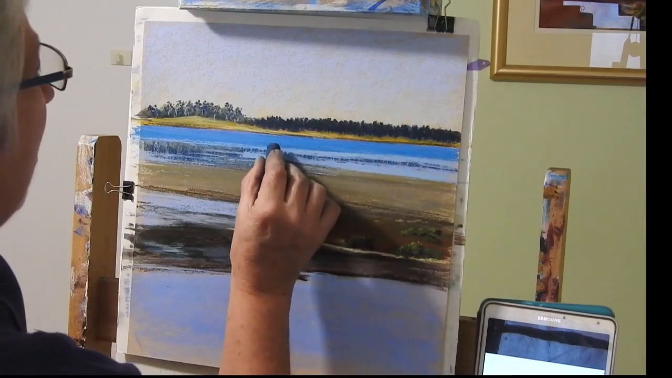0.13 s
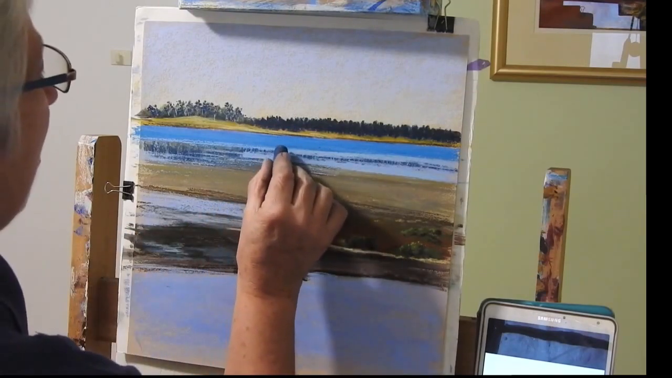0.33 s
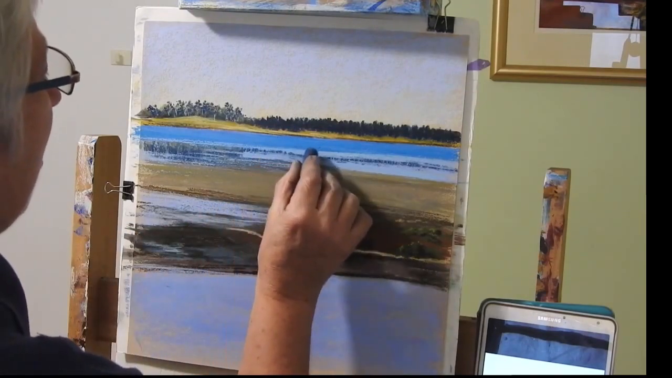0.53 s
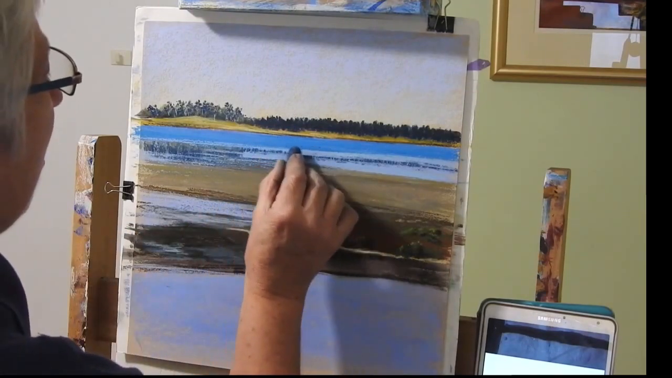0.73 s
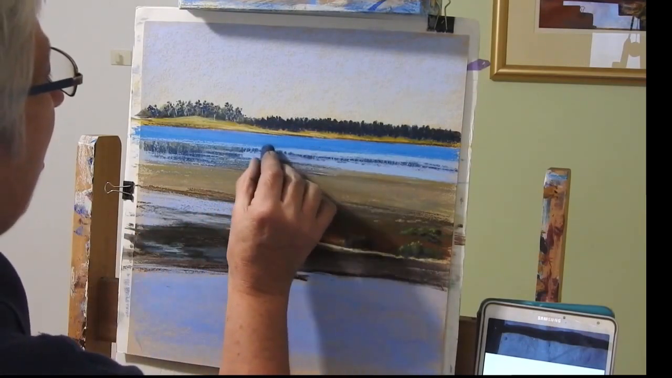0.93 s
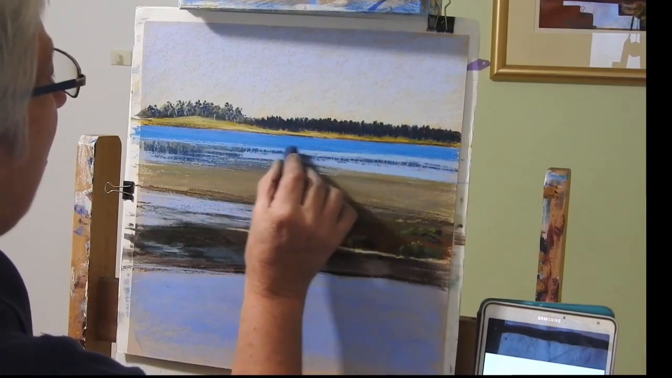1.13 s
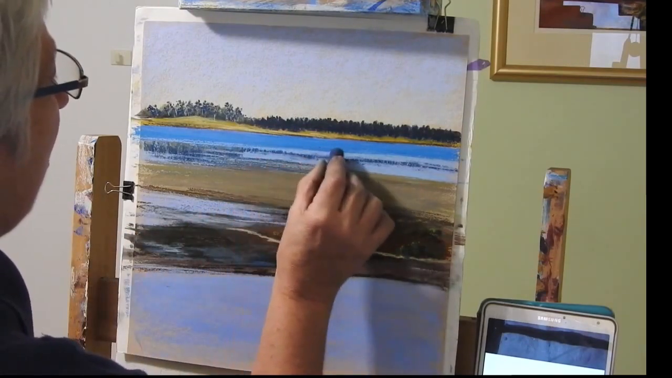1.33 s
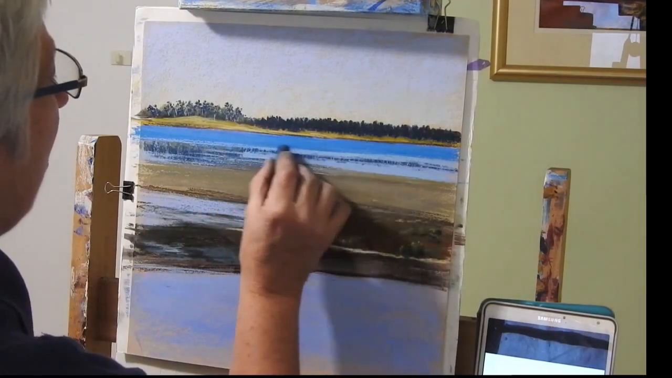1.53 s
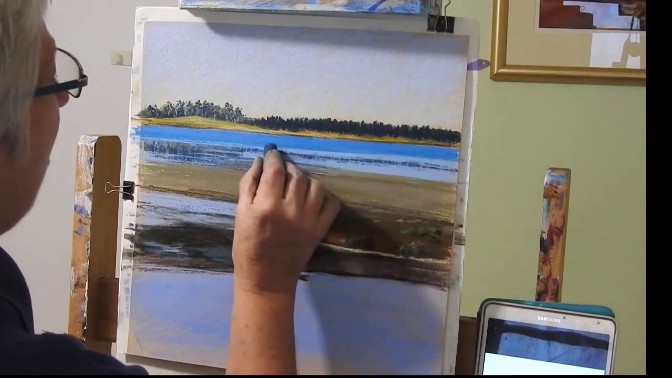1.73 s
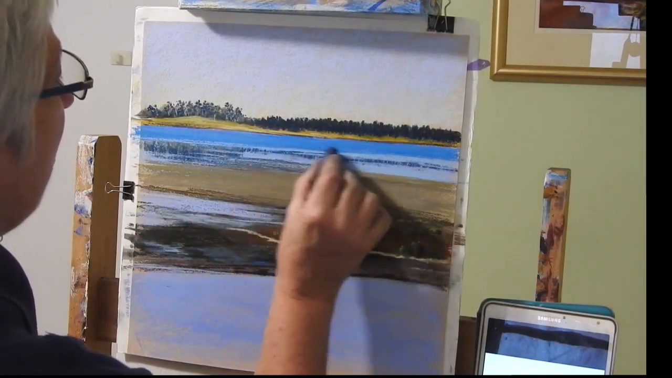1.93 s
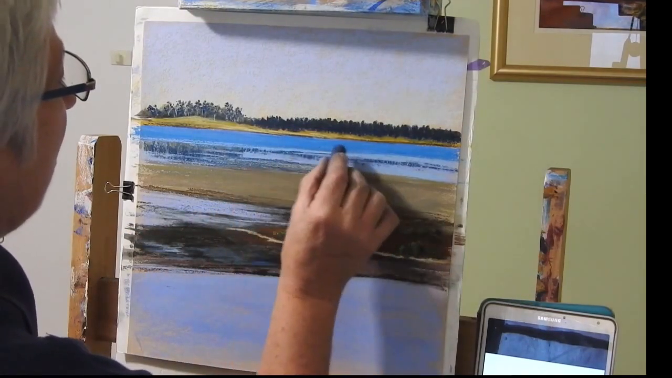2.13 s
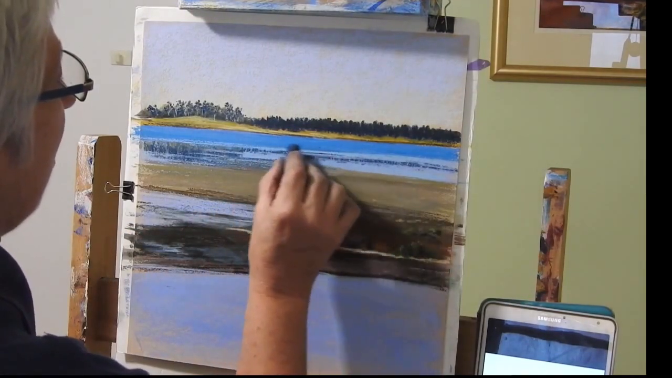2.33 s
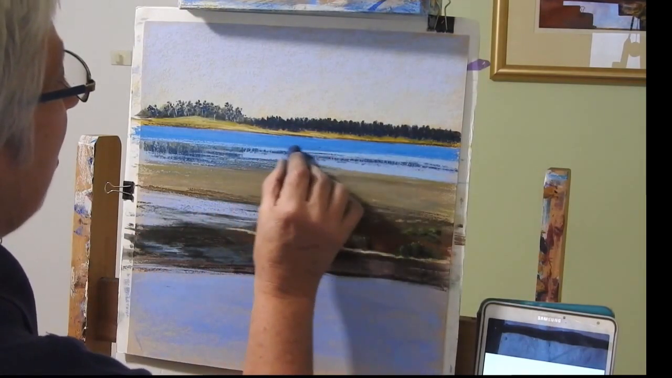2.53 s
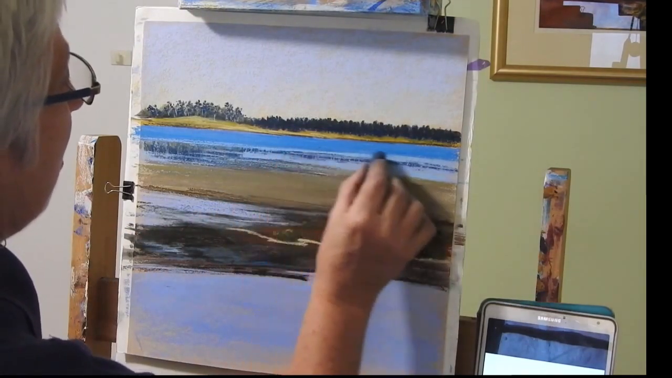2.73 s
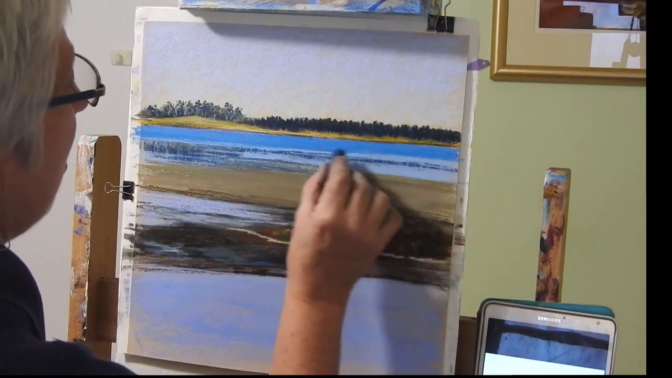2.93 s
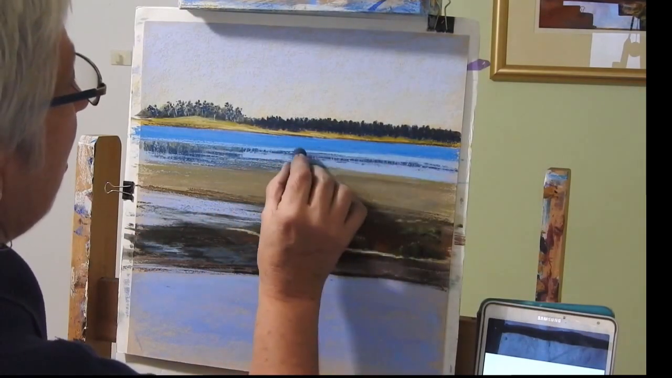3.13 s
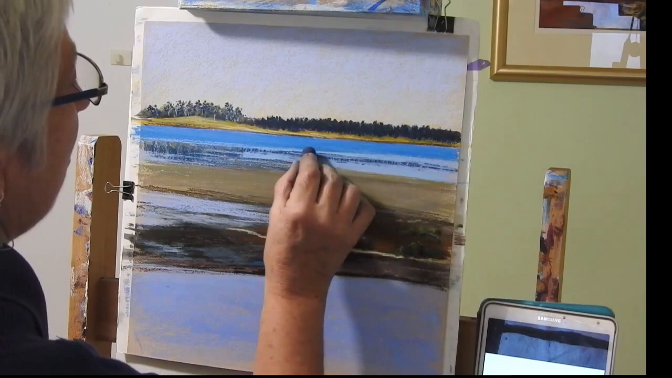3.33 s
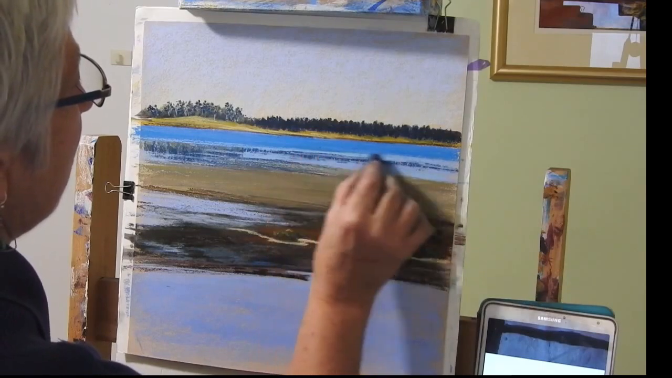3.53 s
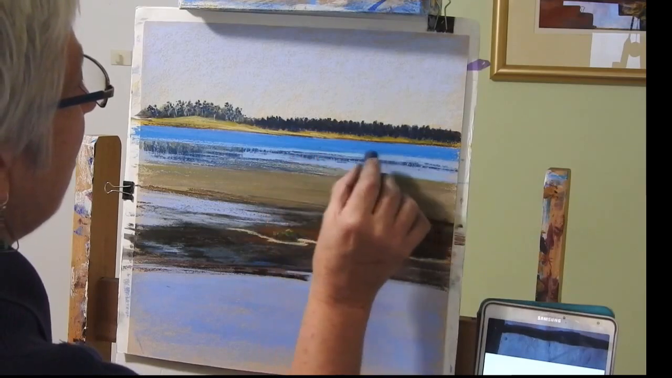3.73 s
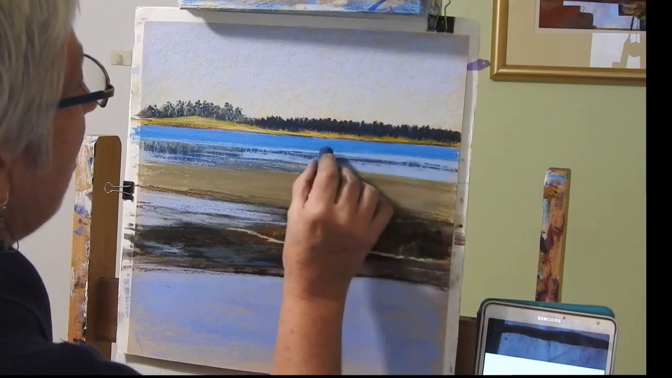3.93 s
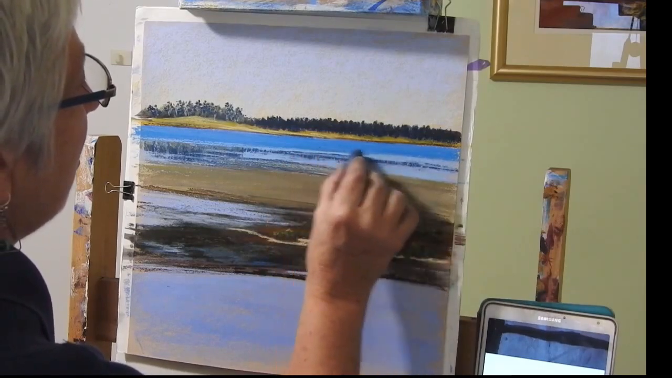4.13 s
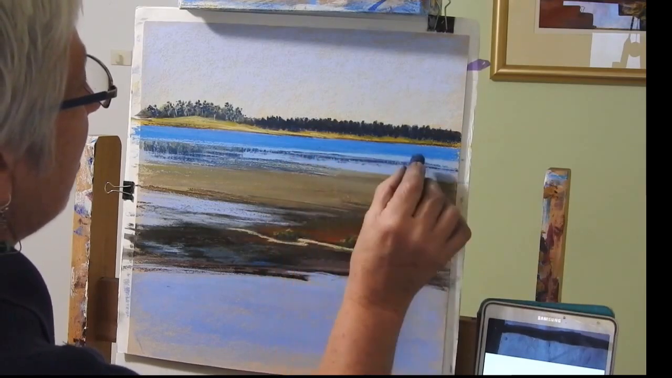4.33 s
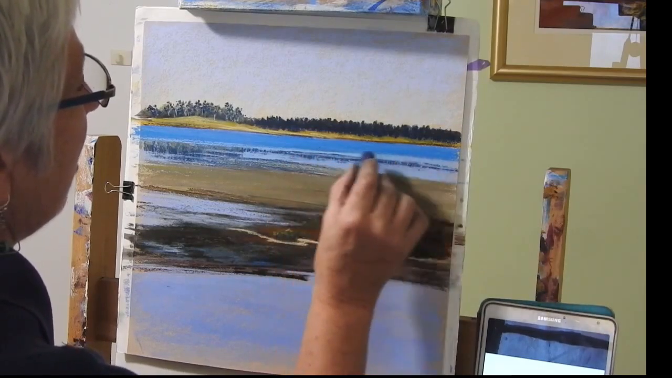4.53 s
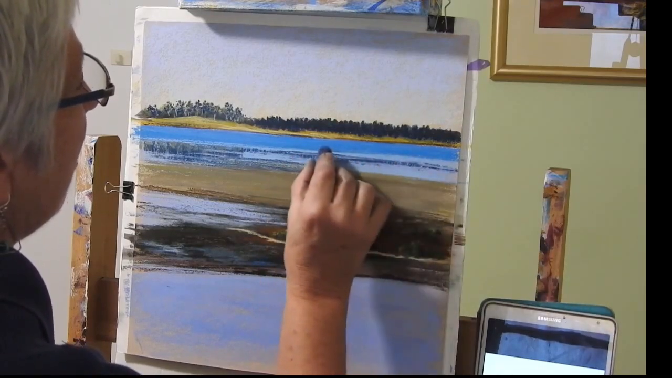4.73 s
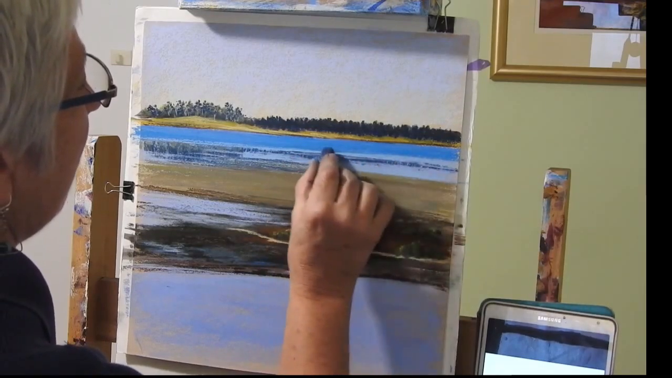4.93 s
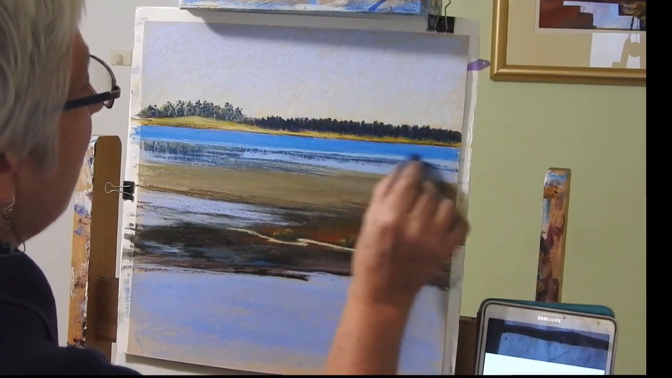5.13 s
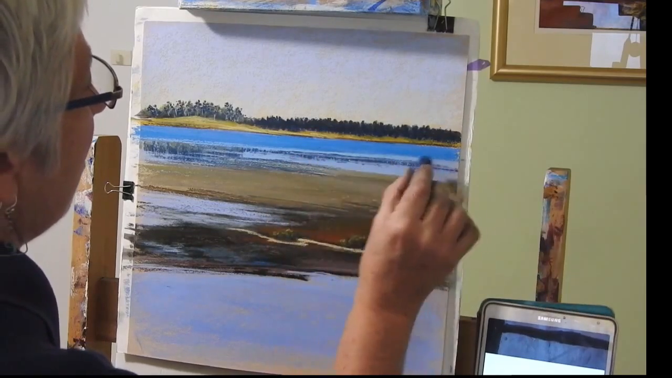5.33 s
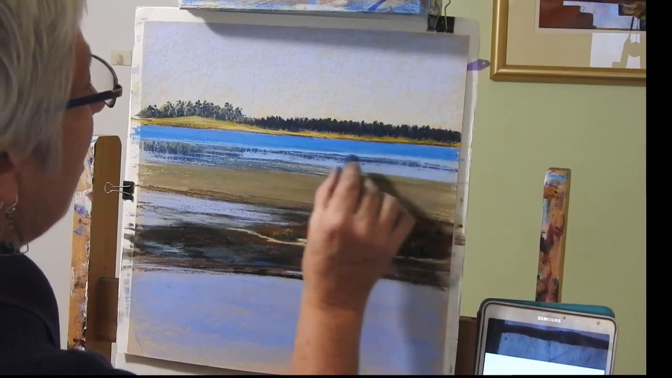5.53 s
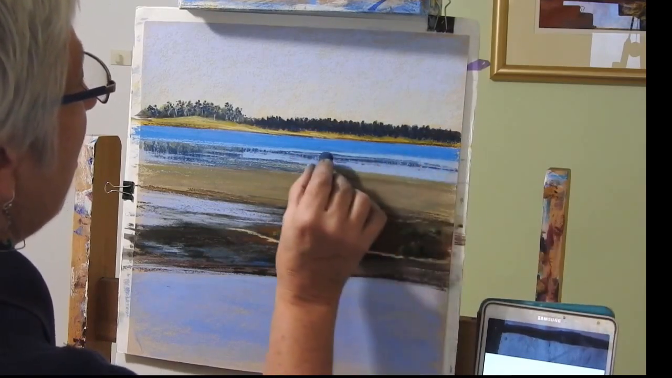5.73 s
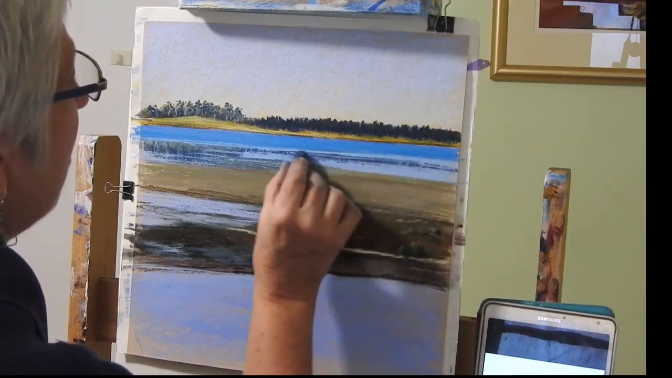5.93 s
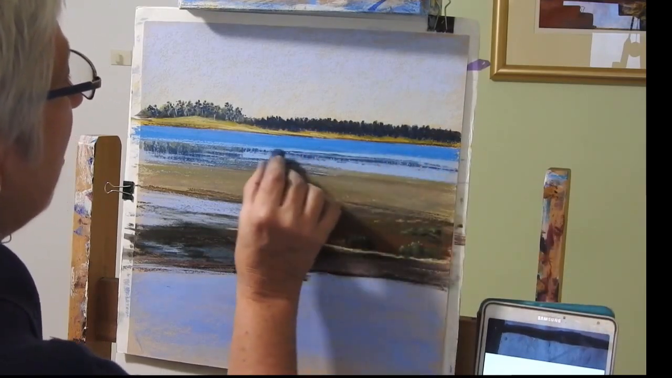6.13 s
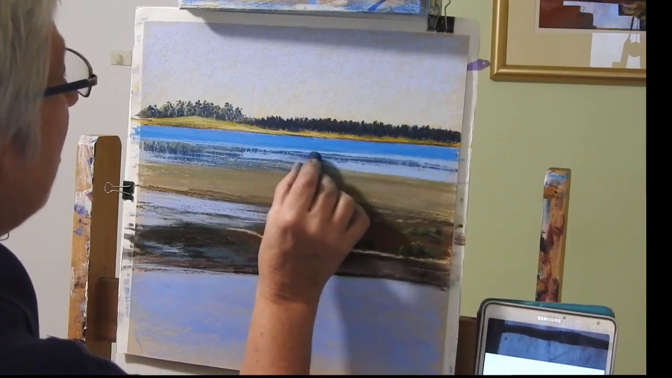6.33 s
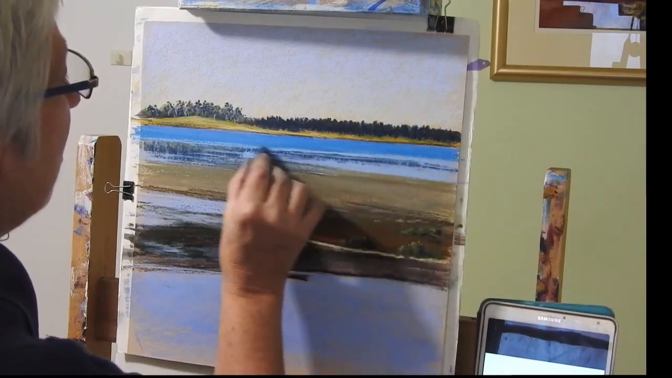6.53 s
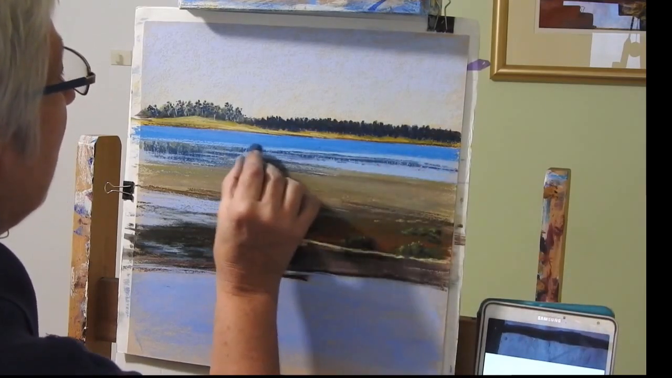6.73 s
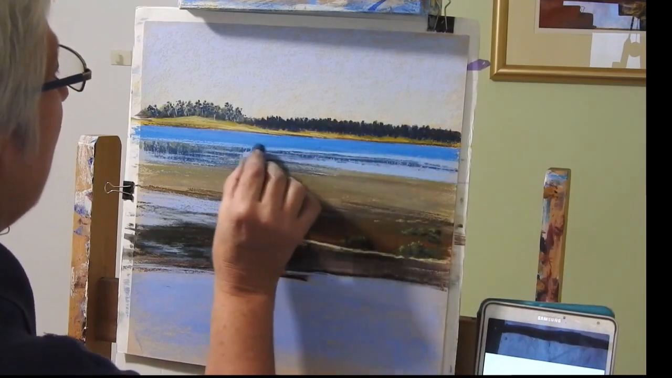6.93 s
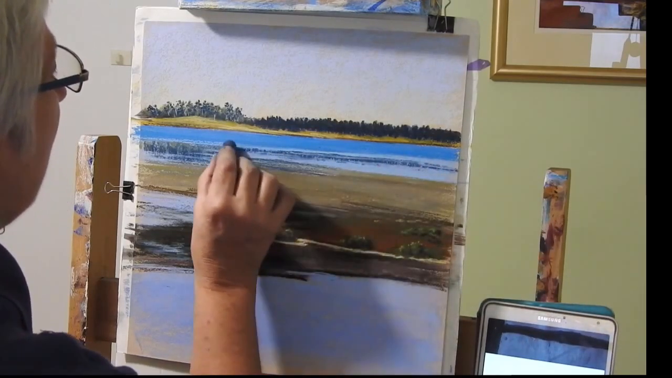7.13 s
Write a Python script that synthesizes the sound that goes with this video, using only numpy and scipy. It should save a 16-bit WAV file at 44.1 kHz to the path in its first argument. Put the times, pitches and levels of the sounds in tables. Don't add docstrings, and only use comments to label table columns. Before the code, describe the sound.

In a quiet indoor room, low engine drone surges through the walls at first, then settles into soft rumble. A pastel stick makes short, dry, gritty scrapes on textured paper, each about a fifth of a second, with hollow woody board ring, small thumps and fizzy flicks at the ends. Strokes come irregularly, with pauses. Close stereo microphone, short room reflection, light hiss.

```python
import sys
import numpy as np
from scipy import signal
from scipy.fft import rfft, irfft
from scipy.io import wavfile

SR = 44100
rng = np.random.default_rng(int(sys.argv[2]) if len(sys.argv) > 2 else 0)


def log_audio(samples):
    frames = np.atleast_2d(samples).T
    limited = np.clip(frames, -1, 1)
    pcm = np.round(limited * 32767).astype(np.int16)
    wavfile.write(sys.argv[1], SR, pcm)


def invert_db(level):
    return 10 ** (np.asarray(level, dtype=float) / 20)


N = 316197


def evened(x):
    return x / np.sqrt(np.mean(x ** 2) + 1e-20)


def read(points, hz):
    f, value = np.transpose(points)
    return np.interp(np.log(hz + 1), np.log(f + 1), value)


def colour(x, points):
    response = invert_db(read(points, np.fft.rfftfreq(N, 1 / SR)))
    return irfft(rfft(x) * response, N)


def slow(top_hz):
    hz = np.fft.rfftfreq(N, 1 / SR)
    noise = rfft(rng.standard_normal(N))
    return evened(irfft(noise / (1 + (hz / top_hz) ** 4), N))


def resonate(x, hz, width):
    r = np.exp(-np.pi * width / SR)
    pole = r * np.exp(2j * np.pi * hz / SR)
    return 2 * signal.lfilter([1 - r], [1, -pole], x).real


def ports(a, b, same, pan):
    hz = np.fft.rfftfreq(N, 1 / SR)
    angle = np.arccos(np.clip(read(same, hz), 0, 1)) / 2
    mid = rfft(a) * np.cos(angle)
    side = rfft(b) * np.sin(angle)
    tilt = invert_db(read(pan, hz) / 2)
    return irfft(np.array([(mid + side) * tilt, (mid - side) / tilt]), N)


# f/Hz, likeness (0 to 1)
RUB_LIKENESS = [(60, .99), (400, .985), (800, .95), (1500, .93), (3100, .7), (6800, .46), (15000, .38)]
# f/Hz, left minus right/dB
RUB_BALANCE = [(60, 2.5), (180, 0), (550, 4), (1650, 0.5), (4970, 0.5), (15000, -1)]


def pastel():
    hand = pressure()
    views = (rub(*hand) for _ in "ab")
    heard = (view + invert_db(-10.5) * room(view) for view in views)
    return ports(*heard, RUB_LIKENESS, RUB_BALANCE)


# touch t/s, full pressure t/s, lift t/s, board ring level/dB, paper rasp level/dB
STROKES = [(0.837, 0.846, 0.88, -50.5, -59.5), (1.04, 1.127, 1.305, -46, -50.5),
           (1.781, 1.858, 2.018, -43, -48.5), (2.544, 2.592, 2.761, -49, -47),
           (3.378, 3.472, 3.62, -46, -48), (4.03, 4.038, 3.987, -49, -74),
           (4.079, 4.107, 4.264, -47.5, -48.5), (4.36, 4.37, 4.39, -73, -68),
           (4.961, 5.059, 5.166, -42.5, -48), (5.942, 5.944, 6.045, -48, -49),
           (6.396, 6.47, 6.59, -46.5, -48.5)]
# ring f/Hz at touch, flex f/Hz, flex re ring level/dB,
# fizz re rasp level/dB, lag to full speed t/s
CONTACT = [(1120, 430, -2, -1, .001), (1200, 430, -3, 0.5, 0.033), (1150, 430, 1, -0.5, 0.0077),
           (1200, 420, -6, 2, 0.071), (940, 425, -1, 0.5, 0.035), (930, 350, 15, -7, .001),
           (1430, 360, -1.5, 3, 0.059), (950, 330, 8, 3, .001), (1430, 352, -0.5, 3, 0.078),
           (1420, 670, -5, -0.5, 0.016), (1130, 580, -2, 0.5, 0.046)]
# t/s, extra ring level/dB, extra flex level/dB,
# ring f/Hz it has slid to
DIGS = [(1.16, 2, 1, 1130), (1.285, -3.5, 3.5, 1400), (1.872, 4, 9, 1128), (1.97, 6.5, -1, 1250),
        (2.01, 0, -0.5, 1420), (2.545, 7, 16.5, 1420), (2.6, 3, 2, 1420), (2.64, 2, 9.5, 1200),
        (2.685, 10, 3, 890), (2.72, 2, -2, 1420), (3.465, 6, -1, 880), (3.51, 3.5, 1.5, 1400),
        (3.551, 2.5, 9.5, 900), (4.13, 1.5, -1.5, 900), (4.205, 7, 3, 830), (4.222, -6, 10.5, 1010),
        (4.975, 4, 4.5, 1430), (5.03, 1, 1.5, 1430), (5.085, 1.5, 5.5, 955), (5.112, 2, 8, 1015),
        (5.155, -2.5, 7, 900), (5.95, 1.5, -4, 1420), (6.02, 4, 0, 1400), (6.035, 3.5, 5.5, 1190),
        (6.465, 7.5, -2.5, 914), (6.477, 0, 9, 1015), (6.52, -1, -1, 1200), (6.575, 5.5, 4.5, 1150)]
# t/s, extra fizz level/dB
FLICKS = [
    (2.02, 5.5),
    (2.71, 7.5),
    (2.77, 3),
    (3.6, 5),
    (4.26, 1.5),
    (5.16, -1),
    (5.187, 10),
    (5.235, 6),
    (6.035, 5.5),
]


def pressure():
    t = np.arange(N) / SR
    gains, flex_favoured = np.zeros((4, N)), np.ones(N)
    for stroke, contact in zip(STROKES, CONTACT):
        touch, full, lift, ring_db, rasp_db = stroke
        _, flex_hz, flex_db, fizz_db, lag = contact
        board = invert_db(ring_db) * drag(t, touch, full, lift, touch_db=-13, db_per_s=301)
        paper = invert_db(rasp_db) * drag(t, touch, full + lag, lift, touch_db=-14, db_per_s=314)
        gains += [board, board * invert_db(flex_db), paper, paper * invert_db(fizz_db)]
        flex_favoured[t > touch - LAND_S] = flex_hz
    dig_s, ring_db, flex_db, ring_hz = np.transpose(DIGS)
    ring_thumps = bumps(t, dig_s, ring_db, width_s=0.018)
    flex_thumps = bumps(t, dig_s, flex_db, width_s=0.018)
    puffs = bumps(t, *np.transpose(FLICKS), width_s=0.014)
    gains *= invert_db(np.array([ring_thumps, flex_thumps, 0.25 * puffs, puffs]))
    touches = [(stroke[0], contact[0]) for stroke, contact in zip(STROKES, CONTACT)]
    path = sorted(touches + list(zip(dig_s, ring_hz)))
    return gains, np.interp(t, *np.transpose(path)), flex_favoured


LAND_S = 0.0073


def drag(t, touch, full, lift, touch_db, db_per_s):
    lean = np.clip((t - touch) / (full - touch), 0, 1)
    land = np.clip((t - touch) / LAND_S + 1, 0, 1)
    return land * invert_db(touch_db * (1 - lean) - db_per_s * np.maximum(t - lift, 0))


def bumps(t, times, db, width_s):
    return sum(d * np.exp(-((t - s) / width_s) ** 2) for s, d in zip(times, db))


# f/Hz, width/Hz, level/dB
FLEX = [(203, 30, -1), (285, 35, -8), (352, 22, 1), (400, 30, -3), (507, 22, -3), (590, 28, -2.5),
        (680, 35, -3)]
# f/Hz, width/Hz, level/dB
RING = [(775, 30, -5), (830, 24, -4), (876, 24, -5), (914, 26, -1), (1015, 22, 1), (1128, 28, -1),
        (1220, 40, -5), (1397, 24, -3), (1432, 30, 0), (1540, 50, -5), (1700, 70, -6), (1860, 70, -9)]
# f/Hz, width/Hz, level/dB
RASP = [(2200, 36, -12), (2690, 180, 31), (2800, 23, 10), (3190, 380, -4), (3120, 51, 46), (4860, 350, 38),
        (5060, 200, 14)]
# f/Hz, width/Hz, level/dB
SHEEN = [(5670, 560, 18), (6900, 81, -22), (8650, 160, 6), (8900, 200, -17), (9030, 110, 20),
         (9850, 180, -5), (10600, 230, -8)]
# f/Hz, density level/dB per Hz
FIZZ = [(1500, -25), (2100, -6), (2900, -4.5), (3700, -7.5), (4700, -4.5), (5500, -1.5), (7500, -4),
        (10300, -1), (11300, -5), (12300, -14), (14000, -22), (15700, -30)]
# f/Hz, level/dB
REACH = [(150, -5), (260, -0.5), (11000, -1), (13000, -5.5), (16000, -9.5)]


def rub(gains, ring_hz, flex_hz):
    coarse, fine = grit(3000, 1.94), grit(14000, 5.2)
    ring = modes(coarse, RING, 2.5, 0.28, ring_hz) * invert_db(1.5 * slow(45))
    flex = modes(coarse, FLEX, 2, 0.32, flex_hz) * invert_db(1.5 * slow(40))
    dust = colour(sheet(fine), FIZZ)
    low = signal.sosfilt(signal.butter(3, 6000, "low", fs=SR, output="sos"), dust)
    high = signal.sosfilt(signal.butter(3, 6000, "high", fs=SR, output="sos"), dust)
    rasp = evened(evened(low) + 0.32 * modes(fine, RASP, 5.1, loose=0.14))
    fizz = evened(evened(high) + 0.2 * modes(fine, SHEEN, 3, loose=0.11))
    stutter = invert_db(1.36 * slow(38))
    layers = [ring, flex, rasp * stutter, fizz * stutter]
    return colour(np.sum(gains * layers, axis=0), REACH)


def grit(per_s, spread_db):
    size = invert_db(spread_db * np.minimum(rng.exponential(1, N), 4))
    size = size * rng.choice([-1, 1], N)
    return evened(size * (rng.random(N) < per_s / SR))


def modes(x, table, shift_db, loose, favour_hz=None, favour_db=8, octaves=0.17):
    peaks, energy = np.zeros(N), np.zeros(N)
    for hz, width, db in table:
        near = 0 if favour_hz is None else np.exp(-(np.log2(hz / favour_hz) / octaves) ** 2)
        gain = invert_db(db + favour_db * near + shift_db * slow(12.5))
        peaks += gain * evened(resonate(x, hz, width))
        energy += gain ** 2
    band = [0.66 * table[0][0], 0.8 * table[-1][0]]
    fill = signal.sosfilt(signal.butter(2, band, "band", fs=SR, output="sos"), x)
    return evened(peaks / np.sqrt(energy) + loose * evened(fill))


def sheet(x, t60=0.053, turns_per_s=2.6, count=7):
    t, ring_t = np.arange(N) / SR, np.arange(4096) / SR
    out = np.zeros(N)
    for k in range(count):
        share = np.cos(np.pi * (turns_per_s * t + k / count)) ** 4
        response = rng.standard_normal(len(ring_t)) * invert_db(-60 * ring_t / t60)
        out += signal.oaconvolve(share * x, response)[:N]
    return evened(out)


def room(x, t60=0.15):
    t = np.arange(SR // 2) / SR
    taps = rng.standard_normal(len(t)) * (t > 0.006)
    dull = signal.lfilter([0.25], [1, -0.75], taps)
    tail = dull * invert_db(-60 * t / t60) + 2 * taps * invert_db(-60 * t / (0.68 * t60))
    return signal.fftconvolve(x, tail / np.linalg.norm(tail))[:N]


# centre t/s, length t/s, f/Hz, level/dB
SURGES = [(.04, .24, 74, -35), (.3, .3, 71.5, -35), (.68, .55, 74, -33), (0, .2, 146, -36),
          (.65, .42, 143.6, -36), (.92, .24, 145, -42), (0, .3, 96, -39), (.32, .25, 97.6, -41),
          (2.55, .3, 96.5, -44), (1.06, .4, 83.5, -40), (1.68, .5, 82, -41), (1.3, .35, 164, -45),
          (1.6, .4, 165.5, -39), (1.88, .35, 165, -46), (1.72, .4, 248, -53), (2.9, .15, 111.8, -46),
          (4.15, .3, 109.5, -47), (6.08, .3, 91.2, -46), (6.95, .4, 89.4, -44), (6.5, .35, 67, -45)]
# start t/s, end t/s, first f/Hz, last f/Hz, level/dB
HUMS = [(1.25, 2.2, 70, 73, -48), (1.05, 3.9, 144.5, 142.5, -51), (4.3, 5.3, 143, 143, -54),
        (.55, 2.4, 98.6, 99.7, -52), (3, 4.6, 110, 109.3, -49), (4.62, 5.92, 92.3, 91.2, -43.5),
        (6.55, 7.3, 89.7, 89.4, -45), (1.1, 3.3, 190, 188, -62), (3.3, 4.8, 187.5, 184, -56),
        (5.6, 7.3, 181, 176, -59), (2.6, 4.4, 211, 209, -61), (5.05, 5.7, 206, 209, -57)]
# f/Hz, density level/dB per Hz
RUMBLE = [(20, -31), (40, -10.5), (60, 1), (90, 2), (130, -3), (170, -6.5), (215, -15), (245, -25),
          (320, -21), (400, -84)]
# t/s, level/dB
RUMBLE_LEVEL = [
    (0, -44.5),
    (1, -43.5),
    (2.5, -44.5),
    (5.5, -44.5),
    (7.17, -47),
]


def traffic():
    t, tones = np.arange(N) / SR, np.zeros(N)
    for (centre, length, hz, db), phase in zip(SURGES, rng.random((len(SURGES), 1))):
        swell = np.cos(np.pi * np.clip((t - centre) / length, -0.5, 0.5)) ** 2
        tones += np.sqrt(2) * invert_db(db) * swell * np.sin(2 * np.pi * (hz * t + phase))
    edge_s, wall_db = 0.13, -1.5
    for start, end, first_hz, last_hz, db in HUMS:
        glide_hz = np.interp(t, [start, end], [first_hz, last_hz])
        turn = 2 * np.pi * (np.cumsum(glide_hz) / SR + rng.random())
        edge = np.clip(np.minimum(t - start, end - t) / edge_s + 0.5, 0, 1)
        tones += np.sqrt(2) * invert_db(db + 1.5 * slow(3.1)) * edge * np.sin(turn)
    level = invert_db(np.interp(t, *np.transpose(RUMBLE_LEVEL)) + 0.9 * slow(5.3))
    a, b = (level * evened(colour(rng.standard_normal(N), RUMBLE)) for _ in "ab")
    return ports(a + invert_db(wall_db) * tones, b, AIR_LIKENESS, AIR_BALANCE)


# f/Hz, density level/dB per Hz
AIR = [(140, -36), (230, -2.5), (279, -25), (321, -10), (397, -15), (457, -12.5), (526, -1.5), (585, -25),
       (639, -3.5), (941, -10), (1140, -11), (1270, -10.5), (2150, -15.5), (6190, -15), (15500, -29.5)]
# f/Hz, width/Hz, level/dB
AIR_TONES = [(344, 36, -73.5), (426.6, 25, -70.5), (534, 39, -64.5), (695, 90, -77), (940, 63, -66.5),
             (1150, 63, -74.5), (1420, 40, -77.5)]
# f/Hz, likeness (0 to 1)
AIR_LIKENESS = [(60, 1), (150, 0.92), (380, 0.69), (950, 0.58), (2380, 0.19), (5980, 0.037), (15000, 0.06)]
# f/Hz, left minus right/dB
AIR_BALANCE = [(60, 2.8), (240, 3.1), (950, 2.4), (3770, 0.92), (15000, 0.46)]


def air():
    views = []
    for _ in "ab":
        wash = invert_db(-57 + 0.55 * slow(15)) * evened(colour(rng.standard_normal(N), AIR))
        hum = np.zeros(N)
        for hz, width, db in AIR_TONES:
            tone = evened(resonate(rng.standard_normal(N), hz, width))
            hum += invert_db(db + 2.84 * slow(6)) * tone
        views.append(wash + hum)
    return ports(*views, AIR_LIKENESS, AIR_BALANCE)


def scene():
    return pastel() + traffic() + air()


def drop_faint_treble(x, margin_db=17.5, ragged_db=3, from_hz=12400):
    lead = 1024 - 696
    window = np.sin(np.pi * (np.arange(2048) + 0.5) / 2048)
    hz, _, z = signal.stft(np.pad(x, [(0, 0), (lead, 0)]), SR, window, 2048, 1024)
    bin_power = (abs(z[..., :1024, :]) ** 2).mean(0)
    power = bin_power.reshape(32, 32, -1).mean(1)
    fizz = power[9:16].mean(0)
    under_db = 10 * np.log10(fizz / power) + ragged_db * rng.standard_normal(power.shape)
    empty = (under_db > margin_db) & (hz[:1024:32, None] > from_hz)
    z[:, :1024] *= ~np.repeat(empty, 32, axis=0)
    return signal.istft(z, SR, window, 2048, 1024)[1][:, lead:lead + N]


def top_cut(x):
    return signal.sosfilt(signal.butter(12, 15630, fs=SR, output="sos"), x)


def record(dry):
    mix = drop_faint_treble(dry) - 0.0003
    return top_cut(mix)


dry = scene()
out = record(dry)
log_audio(out)
```